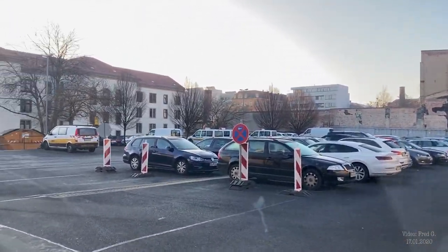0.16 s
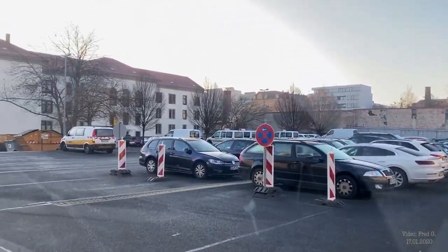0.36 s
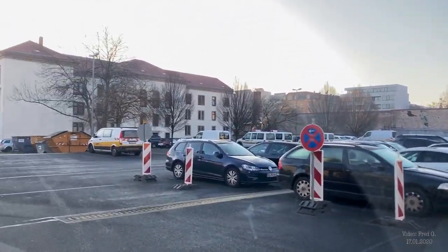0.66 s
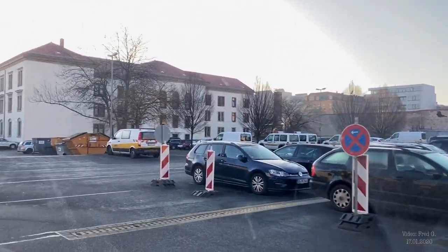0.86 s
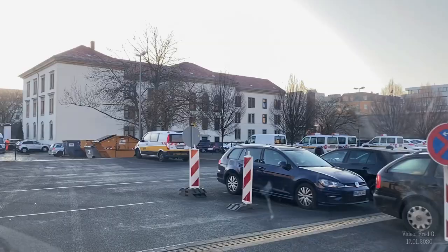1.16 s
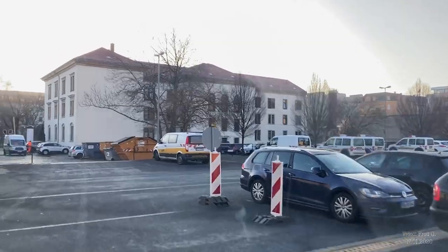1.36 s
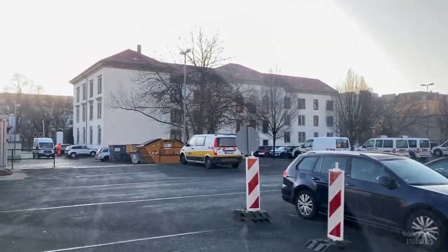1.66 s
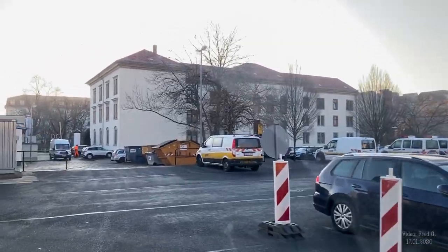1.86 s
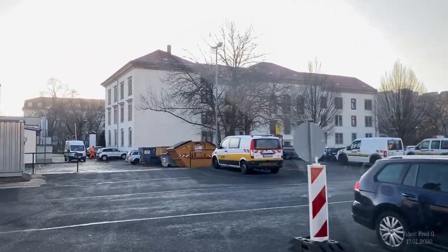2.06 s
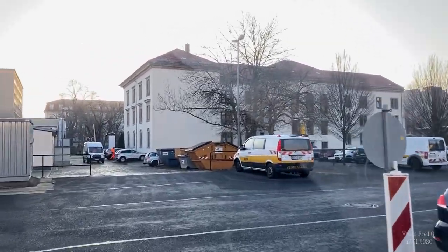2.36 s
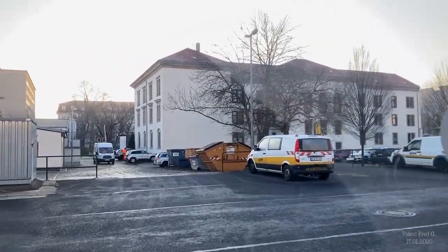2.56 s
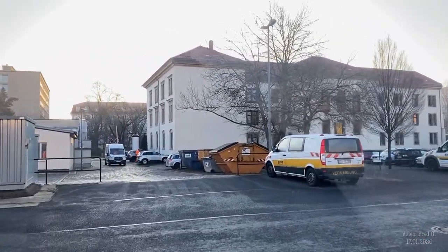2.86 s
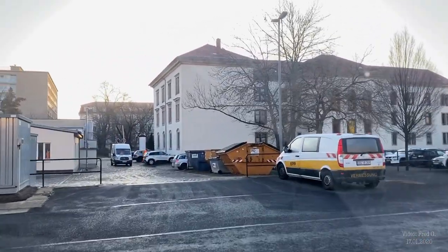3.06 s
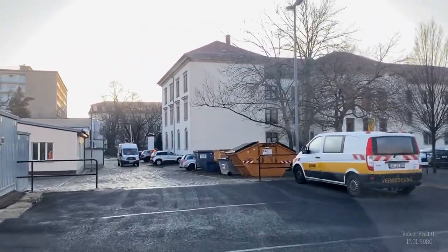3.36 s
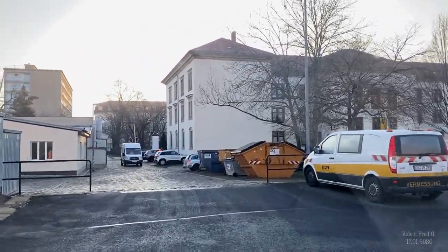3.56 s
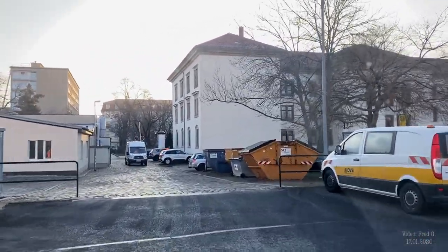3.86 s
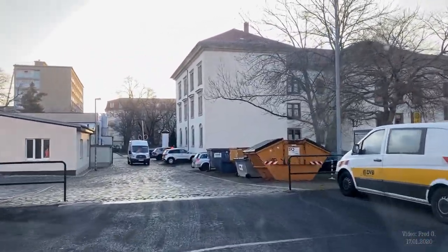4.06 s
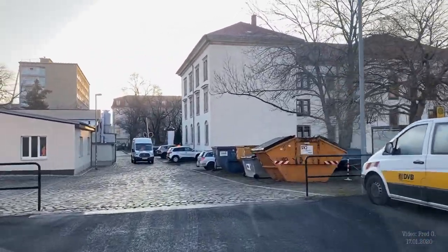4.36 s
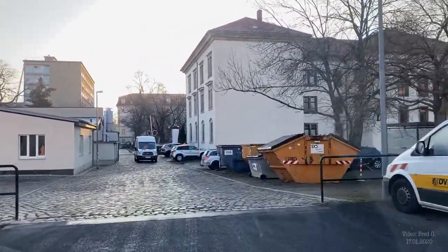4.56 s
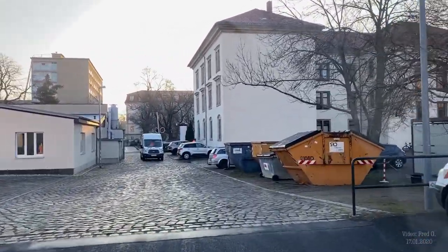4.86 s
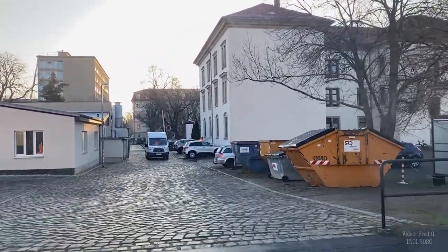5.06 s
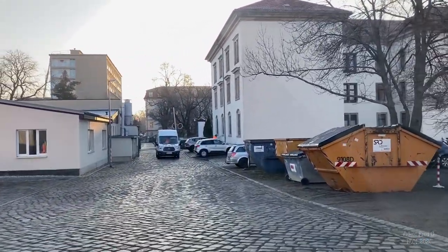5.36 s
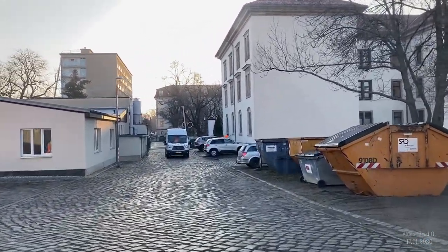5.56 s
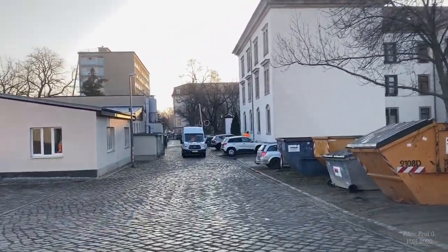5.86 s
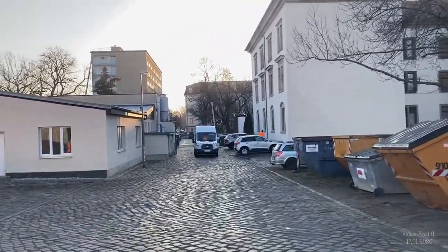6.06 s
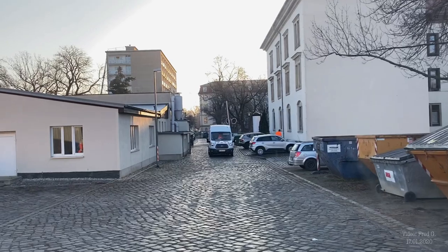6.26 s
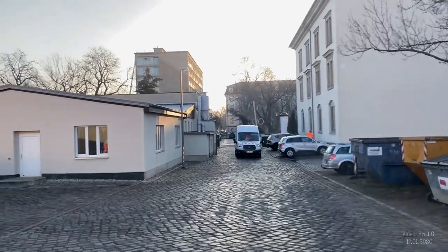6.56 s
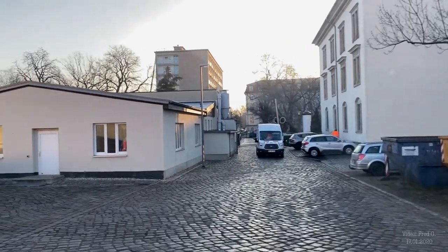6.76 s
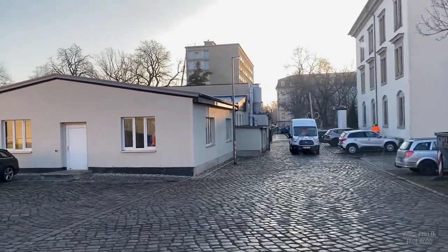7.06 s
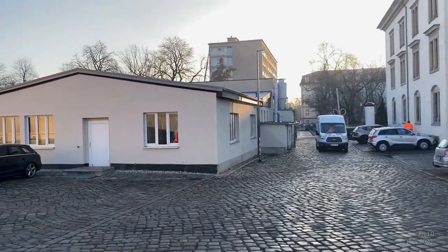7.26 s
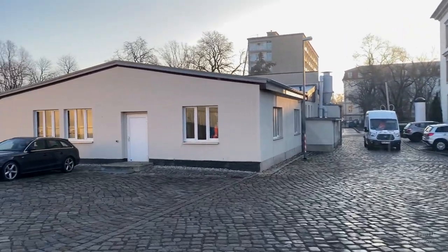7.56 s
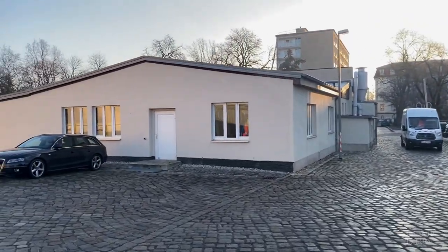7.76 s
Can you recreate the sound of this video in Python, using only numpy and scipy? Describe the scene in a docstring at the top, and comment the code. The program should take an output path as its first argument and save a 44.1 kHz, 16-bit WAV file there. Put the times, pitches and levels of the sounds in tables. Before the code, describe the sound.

A stereo microphone in a closed car cabin picks up low engine drone, body boom and muffled rolling noise, with faint cloth rubbing. Occasional bumps set off plastic ticks and hollow knocks. The motor drops to idle, stays calm for a while with a faint thin metallic ring, then picks up as cobbles shake the body hard, bringing fast thumps, rattles and jingles until the end.

```python
"""The engine hums under light load, idles, then pulls again, heard inside a car crossing a yard at walking pace.
It is a few multiples of the firing rate plus a rasp of resonant noise. The road shakes body modes, gently on
asphalt and hard on cobblestones; the tyres are shaped noise with slaps, grit and thumps.
Cloth and seats rustle as swelling noise, a loose metal part jingles in resonant bursts,
and trim ticks and loose load knocks as short decaying rings."""
import sys
import numpy as np
from scipy import signal
from scipy.fft import rfft, irfft, next_fast_len
from scipy.io import wavfile
from scipy.ndimage import uniform_filter1d, map_coordinates

SR = 44100
rng = np.random.default_rng(int(sys.argv[2]) if len(sys.argv) > 2 else 0)


def digitize_waveform(pressure):
    """Quantize a signal to 16-bit integers and store it at the path in sys.argv[1].

    Rows of a 2-D input are taken as channels; values are limited to [-1, 1].
    """
    field = np.atleast_2d(pressure).T
    bounded = np.clip(field, -1, 1)
    quanta = np.round(bounded * 32767).astype(np.int16)
    wavfile.write(sys.argv[1], SR, quanta)


N = 348390


def amp(db):
    """Decibels to linear gain."""
    return 10 ** (np.asarray(db) / 20)


def unit(x):
    """Scale to an rms of 1."""
    return x / np.sqrt(np.mean(x ** 2) + 1e-20)


def along(points, hz):
    """Read (f/Hz, value) points on a log frequency axis."""
    f, v = np.transpose(points)
    return np.interp(np.log(hz + 1), np.log(f + 1), v)


def curves(rows):
    """One value per sample for each column after the time."""
    s, *cols = np.transpose(rows)
    return [np.interp(np.arange(N) / SR, s, c) for c in cols]


def wobble(rate):
    """A smooth random curve, rate knots a second."""
    knots = rng.standard_normal(int(N * rate / SR) + 4)
    return map_coordinates(knots, [np.arange(N) * rate / SR])


def filtered(x, response):
    """x times a complex response of frequency; the ends are mirrored so that running sound does not click."""
    edge = SR // 8
    margins = [(0, 0)] * (x.ndim - 1) + [(edge, edge)]
    wide = np.pad(x, margins, mode="reflect", reflect_type="odd")
    m = next_fast_len(wide.shape[-1])
    spectrum = rfft(wide, m) * response(np.fft.rfftfreq(m, 1 / SR))
    return irfft(spectrum, m)[..., edge:edge + x.shape[-1]]


def modes(table):
    """The causal response of a set of resonances, with alternating signs."""
    def response(f):
        return sum((-1) ** k * amp(db) * 1j * f * width / (centre ** 2 - f * f + 1j * f * width)
                   for k, (centre, width, db) in enumerate(table))
    return response


def steep(table):
    """Resonances applied twice, with dark valleys between them; their table levels in dB count double."""
    return lambda f: modes(table)(f) ** 2


def shape(spectrum):
    """The gain of a smooth spectrum."""
    return lambda hz: amp(along(spectrum, hz))


# Cabin stereo image: f/Hz, left-right likeness (1 = identical)
SIDE_LIKENESS = [(60, 1), (130, 0.98), (290, 0.81), (450, 0.039), (800, 0.16), (1200, 0.052), (1750, 0.074),
                 (2400, 0.087), (4000, 0.28), (4700, 0.25), (5600, 0.084), (6900, 0.19), (7500, 0.092),
                 (8200, 0.53), (10600, 0.89), (13300, 0.96), (15500, .9)]


def rush(response, size=N):
    """Stereo noise of rms 1, as alike on both sides as the cabin makes it."""
    def mid_side(hz):
        turn = np.arccos(np.clip(along(SIDE_LIKENESS, hz), -1, 1)) / 2
        return response(hz) * np.array([np.cos(turn), np.sin(turn)])
    mid, side = filtered(rng.standard_normal((2, size)), mid_side)
    return unit(np.array([mid + side, mid - side]))


def even(x, seconds):
    """Noise with its own slow swells reduced."""
    power = uniform_filter1d(np.mean(x ** 2, 0), size=round(seconds * SR))
    return x / np.sqrt(abs(power) + 0.19)


def contacts(level, rate, spread_db):
    """Single blows at random moments, on average rate a second."""
    return level * (rng.random(N) < rate / SR) * amp(spread_db * rng.standard_normal(N))


def struck(s, db):
    """Single blows of the given sizes at the given times."""
    blows = np.zeros(N)
    np.add.at(blows, np.minimum(np.round(s * SR).astype(int), N - 1), amp(db))
    return blows


def decay(t, t60, rise_s):
    """A quick rise, then a fall of 60 dB in t60 seconds."""
    return amp(-60 * t / t60) * (1 - np.exp(-t / rise_s))


def dying(blows, t60, rise_s):
    """The envelope left by blows that each rise quickly and die away."""
    t = np.arange(SR // 4) / SR
    return signal.fftconvolve(blows, decay(t, t60, rise_s))[:N]


def rung(blows, table):
    """Blows ringing a set of modes; a blow of size 1 peaks at 1."""
    answer = irfft(steep(table)(np.fft.rfftfreq(SR, 1 / SR)), SR)
    return signal.fftconvolve(blows, answer[:SR // 2] / abs(answer).max())[:N]


# Engine run: t/s, firing rate f/Hz, load level/dB
ENGINE_RUN = [(0, 45.84, -23), (.5, 48.1, -21.5), (1.1, 48.89, -23), (2, 49.97, -21), (2.4, 48.63, -23.5),
              (3, 50.5, -23.5), (3.6, 50.87, -22.5), (3.92, 49.3, -26), (4.1, 43.83, -26),
              (4.25, 39.35, -30.5), (4.5, 29.8, -39.5), (4.8, 26.92, -33), (5.2, 26.93, -25.5),
              (5.7, 26.25, -28.5), (6.12, 26.59, -24.5), (6.28, 38.03, -24), (6.7, 41.92, -35.5),
              (7, 44.04, -24.5), (7.3, 46.6, -21.5), (7.55, 45.43, -29), (7.9, 39.16, -25)]
# Engine harmonics: multiple of the firing rate, level/dB
FIRING_LINES = [(1, 1), (2, -2), (3, -7), (4, -8)]
# Engine mounts, the path into the cabin: f/Hz, level/dB
MOUNTS = [(25, -25), (40, -2), (52, 0.5), (80, 3.5), (100, -5), (150, -23), (200, -17), (300, -21)]
# Bulkhead resonances, applied twice: f/Hz, width/Hz per pass, level/dB per pass
RASP_MODES = [(298, 26, 6.5), (420, 20, 5), (640, 200, -5), (785, 70, -1.5), (947, 45, 1.8),
              (1430, 110, -4), (2750, 400, -12)]
WANDER = .07  # radians, scale of the firing rhythm's straying


def engine():
    """Multiples of the firing rate through the mounts, and a rasp that puffs once a firing and grows with speed."""
    hz, load_db = curves(ENGINE_RUN)
    phase = 2 * np.pi * np.cumsum(hz) / SR
    hum = 0
    for k, db in FIRING_LINES:
        level = amp(db + along(MOUNTS, k * hz) + 0.66 * wobble(8.2))
        hum = hum + level * np.sin(k * (phase + WANDER * wobble(8)) + k)
    rasp_db = -25.5 + 60 * np.log10(hz / 50) + 1.5 * wobble(7)
    puffs = 1 + 0.12 * np.sin(phase)
    rasp = amp(rasp_db) * puffs * rush(steep(RASP_MODES))
    return amp(load_db) * (np.sqrt(2) * hum + rasp)  # root 2 makes the line levels rms


# Road under the wheels: t/s, heave level/dB, boom level/dB, drone level/dB, roar level/dB
ROAD_LEVELS = [(0, -35, -24, -33, -44.5), (.3, -35.5, -29, -35, -46), (.9, -29, -23.5, -35, -45),
               (1.5, -28, -23.5, -36.5, -44), (1.95, -36, -23, -31.5, -47),
               (2.35, -25.5, -29, -35.5, -47.5), (2.9, -40, -23.5, -36, -45), (3.4, -35, -25, -36, -45.5),
               (3.9, -24, -24, -35, -46.5), (4.2, -27, -26.5, -38, -51), (4.6, -37, -29.5, -34, -50.5),
               (5.2, -34.5, -26, -36.5, -50), (5.75, -29, -29.5, -35.5, -49), (6, -34, -27.5, -36.5, -49),
               (6.3, -15.5, -25, -28, -43), (6.6, -22.5, -23.5, -32, -44.5), (6.95, -17.5, -16, -34, -48.5),
               (7.25, -26, -15, -31.5, -44), (7.6, -15.5, -20, -33.5, -47.5), (7.9, -15.5, -20.5, -35, -45)]
# Wheel blows: t/s, boom peak level/dB, heave peak level/dB, tyre drone blow level/dB
WHEEL_BLOWS = [(0.741, -24.5, -33.5, -22), (0.945, -18.5, -35.5, -50), (1.292, -18.5, -21.5, -23),
               (1.552, -34, -34.5, -52), (2.083, -12.5, -26.5, -24.5), (2.617, -12, -15.5, -31),
               (2.721, -20, -16.5, -36), (3.559, -23, -29, -35), (4.121, -29.5, -36, -41),
               (4.935, -18.5, -38, -32.5), (5.08, -18.5, -35, -28.5), (5.309, -18, -45, -30.5),
               (6.102, -22.5, -29, -41.5), (6.279, -19, -13, -33.5), (6.342, -18, -23.5, -21.5),
               (6.491, -18, -37, -21.5), (6.621, -23, -15, -35), (6.76, -35, -18, -24),
               (7.076, -33, -25, -32.5), (7.161, -12.5, -17, -27.5), (7.371, -12.5, -23.5, -24.5),
               (7.477, -17, -13, -41.5), (7.621, -15.5, -9, -31.5), (7.739, -24.5, -25, -36.5),
               (7.855, -13, -23, -29)]
# Slow body modes, applied twice: f/Hz, width/Hz per pass, level/dB per pass
HEAVE_MODES = [(25, 18, -3.5), (39.9, 14.2, 1.5)]
# Cabin air and floor modes, applied twice: f/Hz, width/Hz per pass, level/dB per pass
BOOM_MODES = [(61.12, 6.8, -2), (83.52, 12, 1), (95.38, 13.7, -.5), (112.6, 23.7, -7)]
SHUDDER_DB, SHUDDER_T60, SHUDDER_RISE_S = 5.5, 0.14, 0.023  # envelope gain over the blow, decay s, rise s
UNEVEN_DB, UNEVEN_RATE = 0.5, 4.4  # the road's grain comes and goes: depth dB, knots a second


def road():
    """Road texture and single wheel blows ring the same body modes; each blow leaves a short shudder."""
    heave_db, boom_db = curves(ROAD_LEVELS)[:2]
    s, boom_peak_db, heave_peak_db, _ = np.transpose(WHEEL_BLOWS)
    out = 0
    for table, db, peak_db in [(HEAVE_MODES, heave_db, heave_peak_db), (BOOM_MODES, boom_db, boom_peak_db)]:
        blows = struck(s, peak_db)
        shudder = amp(SHUDDER_DB) * dying(blows, SHUDDER_T60, SHUDDER_RISE_S)
        level = amp(db + UNEVEN_DB * wobble(UNEVEN_RATE)) + shudder
        texture = level * even(rush(steep(table)), 0.058)
        out = out + texture + rung(blows, table)
    return out


# Tyre drone colour, relative: f/Hz, level/dB per Hz
DRONE_COLOUR = [(70, -38.5), (110, -4.5), (146, -6.5), (185, -11.5), (230, -16), (270, -16), (295, -14.5),
                (320, -22.5), (370, -30.5), (600, -49.5), (900, -71)]
# Tyre roar colour, relative: f/Hz, level/dB per Hz
ROAR_COLOUR = [(190, -24.5), (330, 3.5), (377, -5), (411, -1.5), (584, -5.5), (861, -6), (937, -9),
               (1210, -12.5), (1410, -16), (1580, -15), (2480, -24), (2720, -21.5), (3000, -28),
               (6000, -42.5), (7800, -60), (13200, -120)]
# Tyres dropping between stones: t/s, blow level/dB
COBBLE_BLOWS = [(0, -60), (6.12, -62.5), (6.25, -38.5), (6.38, -33), (6.55, -46), (6.9, -54), (7.12, -47),
                (7.25, -41), (7.4, -46.5), (7.9, -47)]
# Floor pan under a thump, applied twice: f/Hz, width/Hz per pass, level/dB per pass
THUMP_MODES = [(190, 150, 5), (310, 70, 4), (420, 80, 3), (620, 200, 1), (950, 300, -1), (1600, 1200, -6)]
SLAP_T60, SLAP_ROAR_DB = 0.11, -30  # the tyre's own answer to a blow: decay s, its roar against its drone
THUMP_RATE, THUMP_SPREAD_DB, THUMP_RISE_S = 75, 3, .003  # cobble thumps: a second, size scatter, rise
GRIT_RATE, GRIT_DB, GRIT_T60 = 110, -8, .02  # small stones: a second, size against the roar, decay s


def tyres():
    """Rolling noise through the floor; the roar flutters with grit, wheel blows slap and cobbles thump."""
    drone_db, roar_db = curves(ROAD_LEVELS)[2:]
    s, *_, slap_db = np.transpose(WHEEL_BLOWS)
    slap = dying(struck(s, slap_db), SLAP_T60, .006)
    drone_level = amp(drone_db + 0.2 * wobble(25) + 1.1 * wobble(8)) + slap
    drone = drone_level * rush(shape(DRONE_COLOUR))

    flutter_db = 0.46 * wobble(11) + 1.24 * wobble(40)
    grit = dying(contacts(amp(GRIT_DB), GRIT_RATE, 2.5), GRIT_T60, .0008)
    roar_level = amp(roar_db + flutter_db) * (1 + grit) + amp(SLAP_ROAR_DB) * slap
    roar = roar_level * rush(shape(ROAR_COLOUR))

    drops = contacts(amp(curves(COBBLE_BLOWS)[0]), THUMP_RATE, THUMP_SPREAD_DB)
    thumps = dying(drops, 0.049, THUMP_RISE_S) * rush(steep(THUMP_MODES))
    return drone + roar + thumps


# Rubbing levels: t/s, cloth level/dB, swish level/dB
RUSTLE_LEVELS = [(0.0, -65, -68.5), (0.46, -72.5, -80.5), (1.27, -64.5, -70.5), (1.96, -67, -77),
                 (2.42, -61.5, -69), (2.97, -63.5, -70.5), (3.52, -67.5, -76), (3.98, -60.5, -70.5),
                 (4.25, -71, -84), (4.84, -71, -75), (5.19, -64, -67), (5.5, -64, -67),
                 (5.65, -61.5, -63.5), (6.2, -57.5, -61.5), (6.62, -56.5, -65.5), (6.8, -61.5, -70),
                 (7.55, -61, -71.5), (7.9, -62.5, -72.5)]
# Longer strokes: middle t/s, length/s, swell level/dB
RUBS = [(0.166, 0.19, 5), (0.901, 0.22, 4.5), (1.391, 0.27, 2.5), (2.229, 0.12, 5.5), (3.17, 0.23, 4.5),
        (5.608, 0.19, 8), (6.247, 0.14, 1.5), (7.174, 0.21, 5), (7.698, 0.11, 7)]
# Cloth colour, relative: f/Hz, level/dB per Hz
CLOTH_COLOUR = [(1500, -18), (2500, -5), (4000, -6), (5600, -9.5), (7000, -7.5), (8800, -9.5), (12000, -26)]
# Swish colour, relative: f/Hz, level/dB per Hz
SWISH_COLOUR = [(6000, -21.5), (8000, -1), (9000, 0.5), (11000, 1), (13000, -1.5), (15000, 2.5),
                (16000, -13.5)]


def rustle():
    """Cloth and seats rub in short strokes of noise; a few longer ones swell out of them."""
    cloth_db, swish_db = curves(RUSTLE_LEVELS)
    t = np.arange(N) / SR
    swells_db = sum(db * np.exp(-(2 * (t - s) / length_s) ** 2) for s, length_s, db in RUBS)
    strokes = amp(swells_db + 1.2 * wobble(10) + 1.33 * wobble(60))
    cloth = amp(cloth_db) * rush(shape(CLOTH_COLOUR))
    swish = amp(swish_db + .8 * wobble(15)) * rush(shape(SWISH_COLOUR))
    return strokes * (cloth + swish)


# Loose metal part and the trim it strikes, applied twice: f/Hz, width/Hz per pass, level/dB per pass
JINGLE_MODES = [(1850, 600, -.5), (3700, 900, -5), (4550, 480, .5), (5200, 400, 0), (5800, 500, -3.5),
                (7300, 1500, -4.5)]
# Bouts of bouncing: start t/s, length/s, contact level/dB
RATTLE_BOUTS = [(5.479, .05, -58), (5.866, .03, -58), (6.001, .07, -57), (6.293, .14, -52),
                (6.592, .03, -51), (6.683, .03, -50), (6.751, .01, -52), (6.779, .03, -48.5),
                (6.842, .01, -48), (6.879, .09, -49.5), (7.004, .03, -52), (7.111, .05, -53),
                (7.222, .07, -51), (7.351, .01, -52), (7.453, .01, -53), (7.608, .01, -54),
                (7.667, .03, -52), (7.757, .1, -54)]
# Thin high ring: start t/s, length/s, f/Hz, wavering scale/Hz, level/dB
WHISTLE = (5.55, .75, 5080, 45, -70)
BOUNCE_S, BOUNCE_SCATTER_S, BOUNCE_SCATTER_DB = .026, .002, 1.8  # from one contact to the next
LOOSE_DB, BUZZ_DB = -5, -4  # stray contacts and steady buzz of the metal part, against the swish level


def whistle():
    """A thin sine ring swells and fades while its pitch and level waver."""
    s, length_s, hz, waver_hz, db = WHISTLE
    swell = np.sin(np.pi * np.clip((np.arange(N) / SR - s) / length_s, 0, 1)) ** .5
    level = amp(db + 4 * wobble(30)) * swell
    pitch_hz = hz + waver_hz * (wobble(12) + wobble(150))
    return level * np.sin(2 * np.pi * np.cumsum(pitch_hz) / SR)


def jingle():
    """A metal part bounces in bouts of quick dying contacts, with stray contacts and a buzz beneath."""
    swish = amp(curves(RUSTLE_LEVELS)[1])
    blows = contacts(amp(LOOSE_DB) * swish, 67, 2.1)
    step = np.arange(12)
    for s, length_s, db in RATTLE_BOUTS:
        late, loud = rng.standard_normal((2, len(step)))
        times = s + BOUNCE_S * step + BOUNCE_SCATTER_S * late * (step > 0)
        inside = BOUNCE_S * step <= length_s
        blows += struck(times[inside], (db + BOUNCE_SCATTER_DB * loud)[inside])
    level = dying(blows, 0.04, .0003) + amp(BUZZ_DB) * swish
    return level * even(rush(steep(JINGLE_MODES)), .004) + whistle()


BURST_T = np.arange(SR // 8) / SR  # time axis of one tick or knock, s


def fade(t60, rise_s=.0004):
    """The envelope of one tick or knock."""
    return decay(BURST_T, t60, rise_s)


def peak(x, db):
    """Scale so that the peaks of the two sides average the given level."""
    return amp(db) * x / abs(x).max(1).mean()


def ring(table, scale, turn):
    """Decaying sines, each a little off in pitch and slightly different on the two sides."""
    def scatter(spread):
        return rng.normal(0, spread, (2, 1))
    out = 0
    for f, db, t60 in table:
        level = amp(db + scatter(1.5)) * fade(t60, .0015)
        hz = scale * f * rng.normal(1, .015)
        out = out + level * np.sin(2 * np.pi * hz * BURST_T + rng.uniform(0, 2) + scatter(turn))
    return out


# Dashboard modes, before the tuning factor: f/Hz, level/dB, t60/s
PANEL_MODES = [(400, 6, .05), (490, 6, .05), (625, 3, 0.05), (730, 2, .05), (814, 1, 0.06), (1060, -2, .05),
               (1200, -3, 0.05), (1410, 2, 0.06), (1520, -3, .045), (1660, -1, 0.05), (1800, -3, .05),
               (1960, -1.5, 0.055), (2130, -2, 0.05), (2280, -2, 0.045), (2450, -6, .04),
               (2800, -11, 0.033)]
PANEL_TURN, KNOCK_TURN = .4, .2  # radians by which a mode's phase scatters from side to side


def tick(db, ring_db, bright_db, pan_db):
    """A noise crack with a bright edge rings the dashboard modes."""
    def band(hz, width_hz):
        return rush(modes([(hz, width_hz, 0)]), size=len(BURST_T))
    crack = peak(fade(0.077) * band(2700, 4100), db)
    edge = peak(fade(0.012) * band(9500, 7000), bright_db)
    dashboard = peak(ring(PANEL_MODES, 0.96, PANEL_TURN), ring_db)  # 0.96 tunes the modes down
    return amp(np.array([[pan_db], [-pan_db]]) / 2) * (crack + edge + dashboard)


# Body of a knock: multiple of its pitch, level/dB, t60/s
HOLLOW_MODES = [(.66, -4, .04), (.82, -3, .045), (1, 0, .055), (1.13, -3, .045), (1.3, -5, .04)]
# Overtones of a knock: multiple of its pitch, level/dB, t60/s
OVERTONES = [(1.55, -4, .04), (1.7, 0, .045), (1.85, -2, .04), (2.1, -6, .035), (2.25, 2, .05),
             (2.6, -3, .035), (2.9, -5, .03)]


def knock(hz, db, over_db):
    """A knock gives a short hollow ring with a puff of noise and a clack of overtones."""
    clack = ring(OVERTONES, hz, KNOCK_TURN)
    puff = fade(.06, .0015) * rush(steep([(hz, 550, 0)]), size=len(BURST_T))
    thud = ring(HOLLOW_MODES, hz, KNOCK_TURN) + amp(-4) * puff
    return peak(thud, db) + peak(clack, over_db)


# Trim ticks: t/s, crack peak level/dB, dashboard ring peak level/dB, bright edge peak level/dB,
# left over right level/dB; the peaks are before the left-right split
TRIM_TICKS = [(0.71, -43, -31, -49, -1.5), (1.187, -42, -47, -57.5, 1), (1.3023, -45, -44, -56.5, 3.5),
              (2.018, -46.5, -36, -54.5, 4.5), (2.0714, -42.5, -42, -45, 2.5), (2.2804, -50, -38, -63, 3),
              (2.7128, -43, -29.5, -51.5, -2), (2.807, -45, -30.5, -51, 3.6),
              (2.9769, -43.5, -36.5, -50.5, 3), (3.7686, -46.5, -42, -60.5, 1),
              (3.877, -46, -46, -54.5, 4.5), (3.911, -48, -56, -55, 8.5), (3.9415, -47, -53, -63, 0),
              (3.9666, -48, -43, -73, 5.5), (4.0086, -42.5, -40, -51, 2), (4.043, -40.5, -45, -48, 3),
              (4.0751, -41.5, -42, -49.5, -1), (4.125, -49, -59, -54, 6.5), (4.194, -47, -46, -49.5, 3),
              (4.285, -48.5, -61, -57.5, 5.5), (4.468, -43, -47, -52.5, 0.5), (5.776, -50.5, -48, -63, 2.5),
              (6.3993, -35.5, -41, -38.5, 1.5), (7.1594, -43, -41, -48, 3), (7.2538, -42, -37.5, -58.5, 6),
              (7.608, -47, -46.5, -54.5, 2.5), (7.8781, -36.5, -28, -43.5, -0.5)]
# Hollow knocks, of loose load and of tyres striking cobbles: t/s, pitch f/Hz, peak level/dB, overtones peak
# level/dB
KNOCKS = [(0.685, 690, -40.7, -48.0), (1.322, 615, -28, -37.6), (2.022, 520, -33, -43),
          (2.034, 1120, -40, -54), (2.094, 1140, -38, -52), (2.285, 430, -37, -43.6),
          (2.578, 1400, -41.8, -54.7), (2.977, 650, -30, -36), (4.01, 480, -36, -44),
          (4.045, 1150, -43, -46), (4.545, 620, -39.5, -43), (5.389, 630, -35, -43),
          (5.407, 2600, -52, -64), (5.542, 560, -39, -50), (5.597, 600, -38, -50),
          (5.778, 2256, -41, -40), (6.17, 1390, -41.0, -51.3), (6.25, 720, -36, -48),
          (6.309, 620, -29.5, -47.2), (6.356, 700, -34, -46), (6.381, 1100, -37, -50),
          (6.421, 330, -28, -40), (6.436, 960, -35, -48), (6.463, 390, -29, -41),
          (6.553, 900, -38, -44), (6.676, 400, -31, -44), (6.502, 620, -31, -42),
          (6.647, 700, -33, -48), (7.095, 620, -28.5, -52), (7.238, 1000, -37, -48),
          (7.315, 620, -31, -48), (7.43, 800, -38, -48), (7.565, 720, -30, -48),
          (7.63, 1360, -44.9, -51.8), (7.738, 1330, -45.7, -46.3)]


def ticks():
    """Trim ticks and knocks, each placed at its own moment."""
    out = np.zeros((2, N + SR))
    for table, sound in [(TRIM_TICKS, tick), (KNOCKS, knock)]:
        for s, *settings in table:
            start = round(s * SR)
            out[:, start:start + len(BURST_T)] += sound(*settings)
    return out[:, :N]


def scene():
    """All layers of the cabin together."""
    return engine() + road() + tyres() + rustle() + jingle() + ticks()


# Level between the two ports: f/Hz, left over right level/dB
PORT_LEAN = [(60, 0), (110, -2), (200, -3), (380, -3.5), (700, 2), (1290, -1), (2380, 0), (4400, 3.5),
             (8120, -3.5), (15000, 1)]
# Phase between the two ports: f/Hz, left lead/radians
PORT_LEAD = [(60, 0), (450, .4), (750, -.3), (1000, 1.6), (1180, 2.4), (1330, .5), (1550, .8), (1680, 3),
             (1950, 3.2), (2150, 6.9), (2600, 6.9), (3100, 5.5), (3700, 7.7), (4400, 7.5), (5400, 8),
             (5750, 2), (7000, 8), (8000, 10.5), (10800, 6.5), (13400, 3), (15600, 0)]
TOP_HZ = 15800  # band limit


def record(dry):
    """Two spaced ports differ in level and phase; deep bass rolls off and nothing passes the band limit."""
    half = np.array([[.5], [-.5]])  # each side takes half of the difference

    def response(hz):
        ports = amp(along(PORT_LEAN, hz) * half) * np.exp(1j * along(PORT_LEAD, hz) * half)
        bass_cut = hz ** 2 / (hz ** 2 + 22 ** 2)
        return ports * bass_cut * (hz < TOP_HZ)
    return filtered(dry, response)


dry = scene()
out = record(dry)
digitize_waveform(out)
```